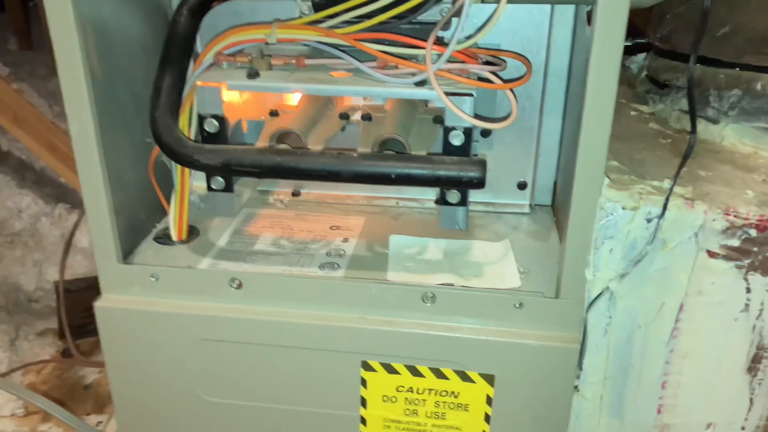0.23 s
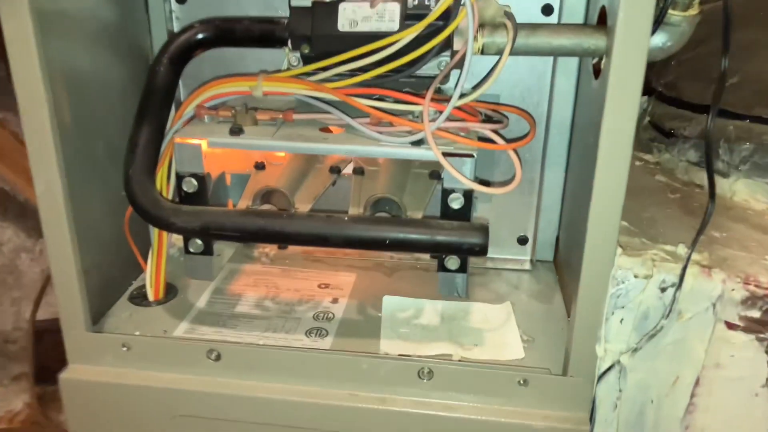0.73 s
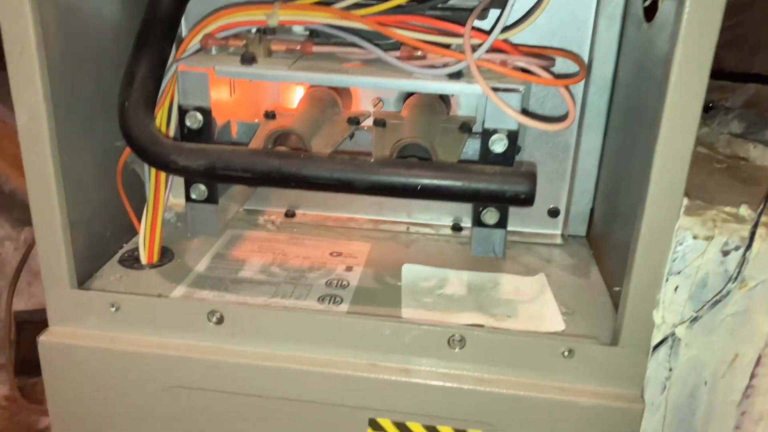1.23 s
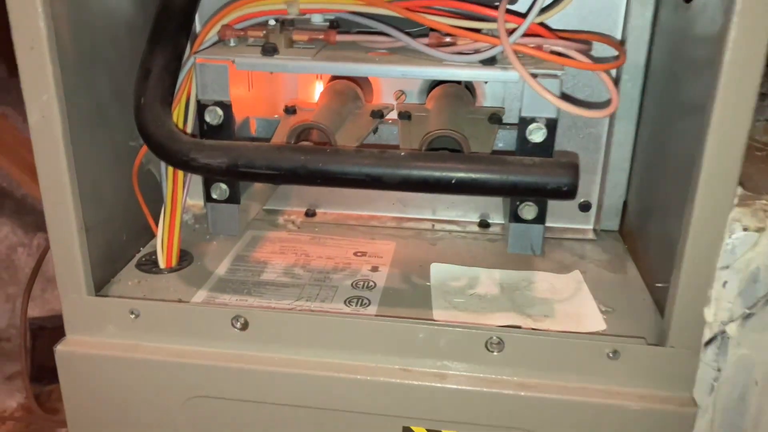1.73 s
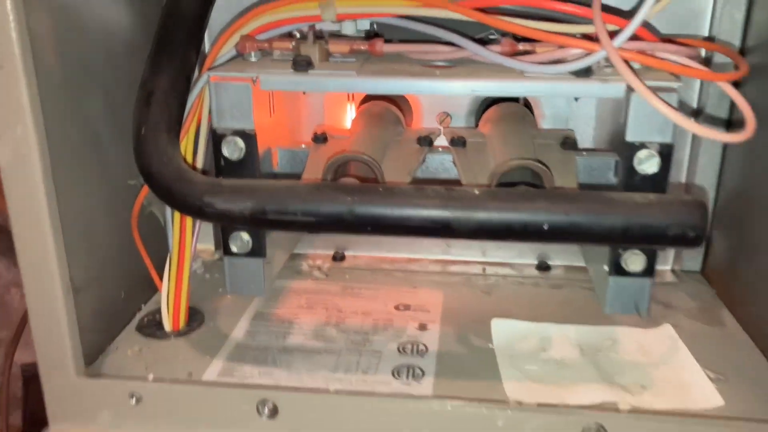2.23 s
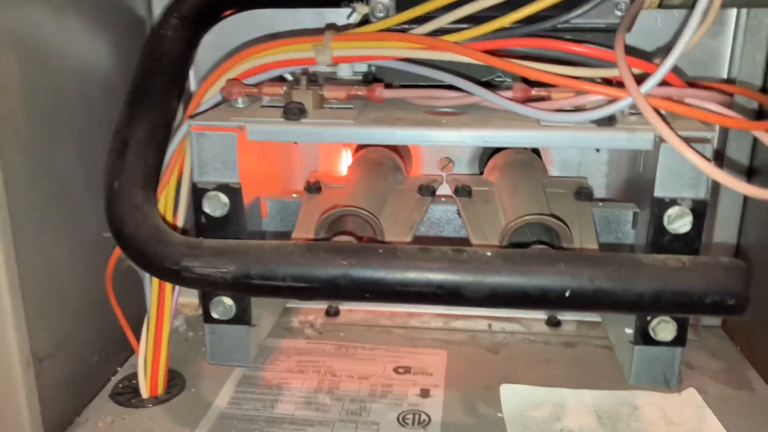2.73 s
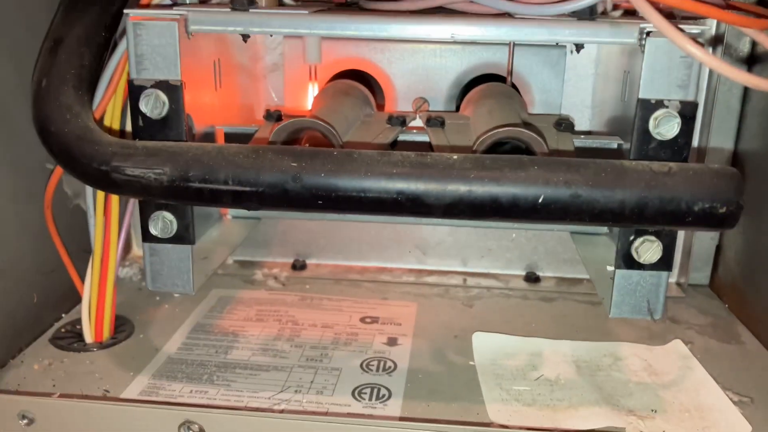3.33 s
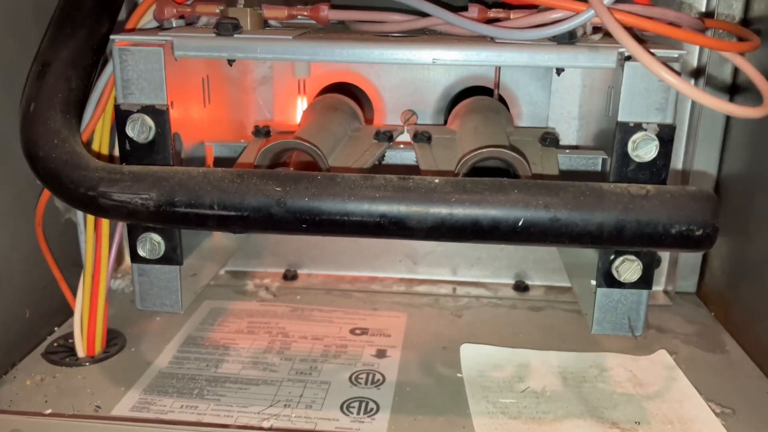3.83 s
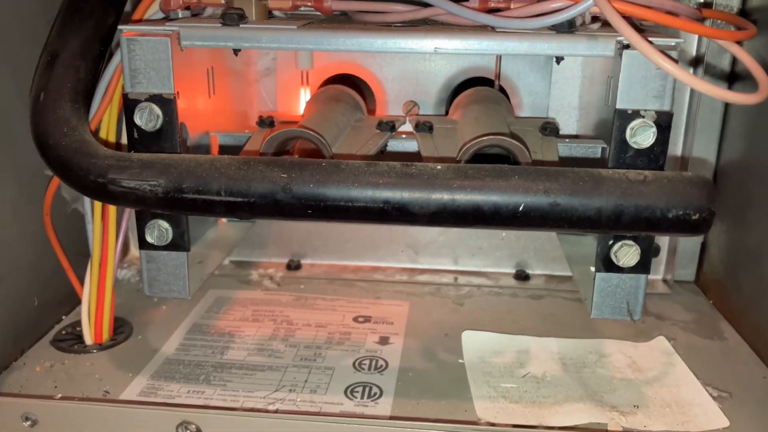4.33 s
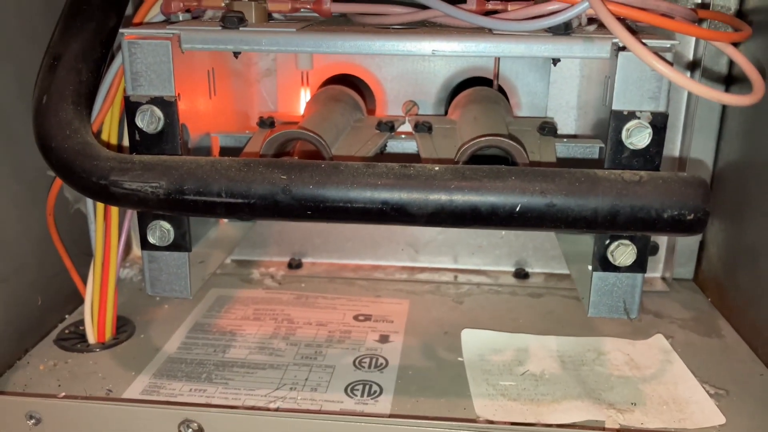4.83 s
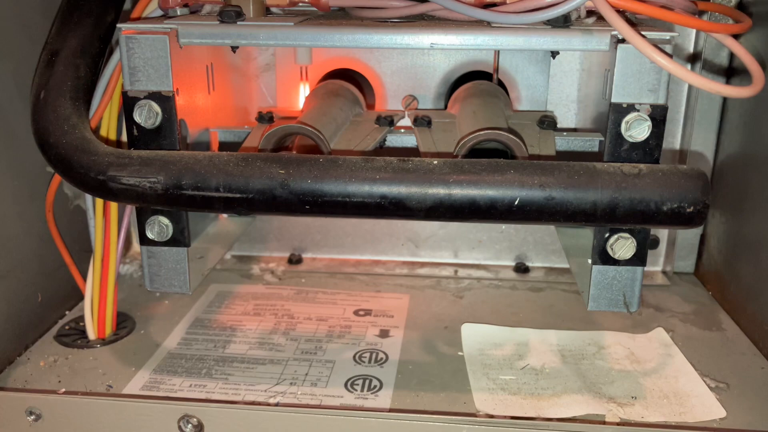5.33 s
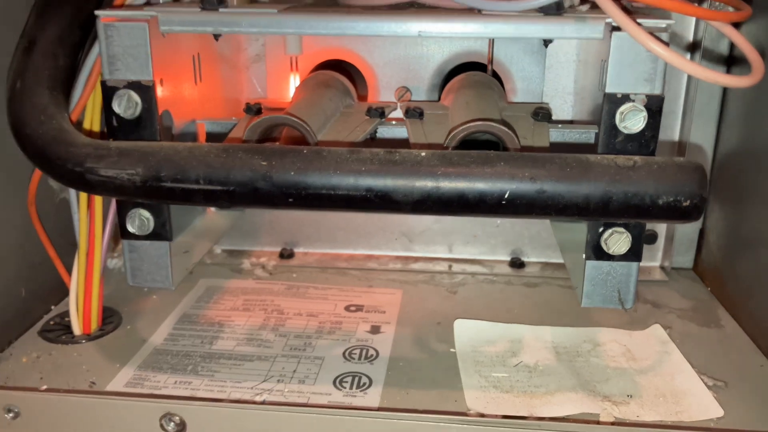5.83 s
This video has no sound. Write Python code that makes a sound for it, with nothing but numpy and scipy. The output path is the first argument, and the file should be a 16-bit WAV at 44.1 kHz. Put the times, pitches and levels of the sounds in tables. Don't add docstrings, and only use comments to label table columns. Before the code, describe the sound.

Steady electric blower drone with a thin whine, breathy airflow and faint flickering whistles, heard increasingly close inside an open metal housing.

```python
import sys
import numpy as np
from scipy import signal
from scipy.io import wavfile
from scipy.ndimage import uniform_filter1d

SR = 44100
rng = np.random.default_rng(int(sys.argv[2]) if len(sys.argv) > 2 else 0)


def generate_wav(sig):
    pcm = np.round(np.clip(np.atleast_2d(sig).T, -1, 1) * 32767).astype(np.int16)
    wavfile.write(sys.argv[1], SR, pcm)


def gain_from_decibels(decibels):
    exponent = np.asarray(decibels, float) / 20
    return 10 ** exponent


N = 267775
FFT, HOP = 2048, 512


def read(points, hz):
    f, *columns = np.transpose(points)
    return [np.interp(np.log(hz + 1), np.log(f + 1), c)[:, None] for c in columns]


def wander(t, top_hz):
    rates = np.geomspace(top_hz / 20, top_hz, 12)
    x = sum(np.sin(2 * np.pi * (f * t + rng.random())) / np.sqrt(f) for f in rates)
    return x / x.std()


def bump(hz, centre_hz, width_hz):
    return 1 / (1 + (2 * (hz - centre_hz) / width_hz) ** 2)


# (time [s], nearness [0-1], hand-held level drift [dB])
APPROACH = [
    (0, 0, -1.5),
    (.5, 0.04, -1.5),
    (1, 0.24, -0.5),
    (1.5, 0.15, -1),
    (2, 0.71, -1),
    (2.5, 0.57, 1.3),
    (3, 0.96, 0.2),
    (3.6, 0.93, 0),
    (6.1, 0.93, -0.1),
]


def approach(t):
    s, near, drift_db = np.transpose(APPROACH)
    return np.clip(np.interp(t, s, near), 0, 1.2), np.interp(t, s, drift_db)


def hidden(near):
    return np.clip((near - 0.71) / 0.25, 0, 1)


# (frequency [Hz], likeness [0-1], left lead [rad], left-right level [dB])
PORTS = [(60, .992, -.08, 0), (330, .985, .15, 1), (560, .82, .1, .3), (800, .88, .1, .5),
         (1100, .9, .2, 2.5), (1650, .6, .4, 1), (1850, .82, .5, 1), (2070, .78, .9, 1),
         (2350, .67, 2.3, 1), (3000, .36, 1.6, 1.5), (4000, .15, 1.5, 1.5), (5400, .55, 2.9, .5),
         (6100, .4, .8, .5), (6450, .985, .15, 0)]


def ports(hz):
    return read(PORTS, hz)


# (multiple of shaft [-], multiple of magnetic hum [-], rms far [dB], rms near [dB])
WHINE = [(1, 0, -44, -43), (0, 1, -38, -36), (1, 2, -38, -37), (2, 2, -43, -39), (0, 3, -47, -45),
         (1, 3, -53, -54), (8, 0, -48, -48), (10, 0, -53, -54), (15, 0, -61, -60), (18, -1, -62, -55),
         (16, 0, -49, -43.5), (14, 1, -59, -54), (17, 0, -61, -54), (18, 0, -47, -42.5), (16, 1, -53, -49),
         (19, 0, -63, -51), (17, 1, -50, -40.5), (19, 1, -59, -57), (17, 2, -55, -51), (18, 2, -60, -52),
         (16, 3, -67, -55), (19, 2, -64, -59), (34, 0, -60, -61), (36, 1, -57, -52), (38, 2, -61, -65)]
# (multiple of shaft [-], of hum [-], left-right level [dB], left lead [rad])
SIDED = [
    (1, 0, 0, -.25),
    (1, 2, 1, .2),
    (2, 2, 2, .2),
    (8, 0, 1, .5),
    (10, 0, -14, 1.9),
    (19, 0, 8, .5),
    (17, 1, 4, .4),
    (17, 2, 5, -.1),
    (19, 2, 10, .8),
    (38, 2, -1, 2.2),
]


def whine(waver_db=0.4):
    shaft_hz, hum_hz, travel_m, trim_db = 55.27, 119.93, 0.29, 0.6
    out = np.zeros((2, N))
    t = np.arange(0, N, 64) / SR
    near, drift_db = approach(t)
    sided = {(shaft, hum): (pan_db, lead) for shaft, hum, pan_db, lead in SIDED}
    clock = np.arange(N) / SR
    heard = clock + np.interp(clock, t, uniform_filter1d(near, 200)) * travel_m / 343
    for shaft, hum, far_db, near_db in WHINE:
        hz = shaft * shaft_hz + hum * hum_hz
        _, port_lead, port_pan_db = np.ravel(ports(np.array([hz])))
        pan_db, lead = sided.get((shaft, hum), (port_pan_db, port_lead))
        turn = 2 * np.pi * (hz * heard + rng.random())
        level_db = far_db + (near_db - far_db) * near + trim_db + drift_db
        level_db = level_db + waver_db * wander(t, 4.0)
        level = np.sqrt(2) * np.interp(clock, t, gain_from_decibels(level_db))
        left, right = gain_from_decibels(pan_db / 2), gain_from_decibels(-pan_db / 2)
        mid = abs(left * np.exp(0.5j * lead) + right * np.exp(-0.5j * lead)) / 2
        out += level / mid * np.array([left * np.cos(turn + lead / 2), right * np.cos(turn - lead / 2)])
    return out


def air_grid():
    return np.fft.rfftfreq(FFT, 1 / SR), np.arange(N // HOP + 5) * HOP / SR


def air_sound(spectra):
    return 10 * signal.istft(spectra, nperseg=FFT, noverlap=FFT - HOP)[1][:, :N]


def rough(hz, t, frames, bins):
    x = rng.standard_normal((len(hz), len(t)))
    x = uniform_filter1d(uniform_filter1d(x, size=bins, axis=0), size=frames, axis=1)
    return x / x.std()


def treble_lead(hz):
    delay = -0.3 * np.maximum(hz - 6450, 0) / 1000
    first_hz, spacing_hz, width_hz = 8000, 2260, 1300
    steps = sum(np.clip((hz - first_hz - k * spacing_hz) / width_hz + 0.5, 0, 1) for k in range(4))
    return (delay - 2.5 * steps)[:, None]


def tube_pitch(near):
    far_hz, near_hz = 2064, 2108
    return far_hz + (near_hz - far_hz) * hidden(near)


def tube_whistle(hz, t, near):
    return bump(hz[:, None], tube_pitch(near), 95) * (11 + 0.8 * wander(t, 15.0))


RUSH_DB = -55.5
# (frequency [Hz], level far [dB], level near [dB])
RUSH = [(25.4, -20, -18), (60.3, -6, -5), (164, -8, -10.5), (294, -14, -5), (526, -15.5, -19.5),
        (675, -21.5, -20.5), (1000, -19, -22.5), (1564, -28, -28.5), (2570, -24, -22.5), (3260, -34, -26.5),
        (5580, -41.5, -36), (9570, -34.5, -36), (13640, -50, -47.5), (16500, -49, -51)]
# (frequency [Hz], width [Hz], lift far [dB], lift near [dB])
CABINET = [(123.6, 37, 5.5, 8), (204, 47, 0, 3), (273, 21, 10.5, 1.5), (360, 22, -6, -0.5),
           (423, 29, 4, 3.5), (595, 70, 4.5, 5.5), (905, 22, -12, 4.5), (1115, 120, 2, 3),
           (1220, 220, 2, 5), (1434, 87, 2.5, 8.5), (1795, 162, 6.5, 6.5), (2175, 60, -5, 4),
           (2330, 33, 6, 8.5), (2540, 44, -7, -0.5), (3120, 100, 6.5, 3.5), (4580, 1540, 8, 2),
           (6350, 580, 4, 2), (8140, 130, 2.5, 5.5)]


def rush(patchy_db=0.85, ripple_db=2.21):
    hz, t = air_grid()
    near, drift_db = approach(t)
    far_db, near_db = read(RUSH, hz)
    for centre_hz, width_hz, lift_far_db, lift_near_db in CABINET:
        peak = bump(hz, centre_hz, width_hz)[:, None]
        far_db = far_db + lift_far_db * peak
        near_db = near_db + lift_near_db * peak
    field_db = far_db + (near_db - far_db) * near + drift_db
    field_db = field_db + tube_whistle(hz, t, near)
    field_db = field_db + patchy_db * rough(hz, t, frames=6, bins=20)
    field_db = field_db + ripple_db * rough(hz, t, frames=70, bins=2)
    same, lead, pan_db = ports(hz)
    same = np.clip(same, 0, 1)
    lead = lead + treble_lead(hz)
    a, b, c, d = rng.standard_normal((4, len(hz), len(t)))
    left = a + 1j * b
    right = (same * left + np.sqrt(1 - same ** 2) * (c + 1j * d)) * np.exp(-1j * lead)
    pair = np.array([left * gain_from_decibels(pan_db / 2), right * gain_from_decibels(-pan_db / 2)])
    return air_sound(pair * gain_from_decibels(RUSH_DB + field_db))


# (frequency [Hz], width [Hz], lift [dB])
INLET_STREAKS = [
    (2335, 39, 7.5),
    (2462, 37, 8),
]


def inlet_hiss():
    hz, t = air_grid()
    near, _ = approach(t)
    level = gain_from_decibels(RUSH_DB - 24.5 - 19 * hidden(near))
    streak_db = sum(db * bump(hz, centre_hz, width_hz) for centre_hz, width_hz, db in INLET_STREAKS)
    inlet = bump(hz, 2444, 860)[:, None] * gain_from_decibels(streak_db)[:, None] * level
    a, b = rng.standard_normal((2, len(hz), len(t)))
    hiss = inlet * (a + 1j * b)
    return air_sound(np.array([hiss, hiss]))


# (time [s], peak level [dB])
FLARES = [(.15, -38), (1.69, -38), (2.32, -38), (3.1, -35), (3.28, -33), (3.72, -32), (3.85, -31),
          (4.11, -36), (4.41, -36), (4.78, -37), (4.9, -34), (5.54, -37)]


def flares():
    length_s, sharp_hz, left_lead_rad = 0.06, 8, 0.8
    out, t = np.zeros((2, N)), np.arange(0, length_s, 1 / SR)
    for s, db in FLARES:
        hz = tube_pitch(approach(s)[0]) + sharp_hz
        turn = 2 * np.pi * (hz * t + rng.random()) + np.array([[left_lead_rad], [0]])
        out[:, round(s * SR):][:, :len(t)] += gain_from_decibels(db) * np.hanning(len(t)) * np.cos(turn)
    return out


def scene():
    return whine() + rush() + inlet_hiss() + flares()


def roll_off(x):
    return signal.sosfilt(signal.butter(12, 16500, fs=SR, output="sos"), x)


def record(dry):
    low_cut = signal.butter(5, 50, "high", fs=SR, output="sos")
    band = signal.sosfilt(low_cut, dry)
    band_limit = signal.firwin(511, 15750, window=("kaiser", 9), fs=SR)
    band = signal.oaconvolve(band, band_limit[None], "same")
    start_s, fade_s = 0.035, 0.065
    fade = np.clip((np.arange(N) / SR - start_s) / fade_s, 0, 1)
    return roll_off(band * fade ** 1.09)


dry = scene()
out = record(dry)
generate_wav(out)
```